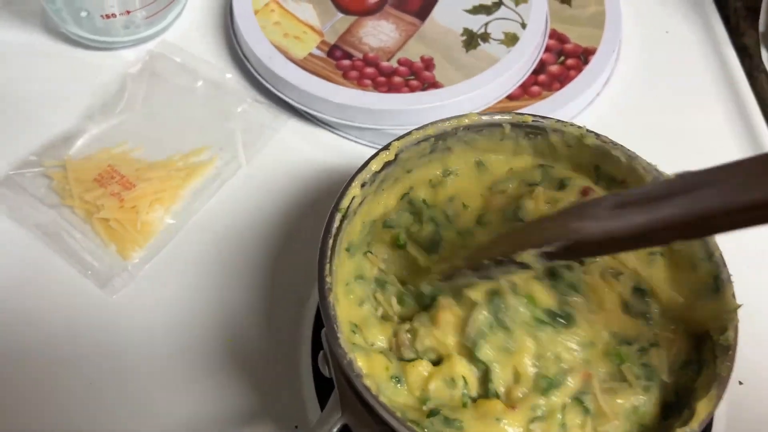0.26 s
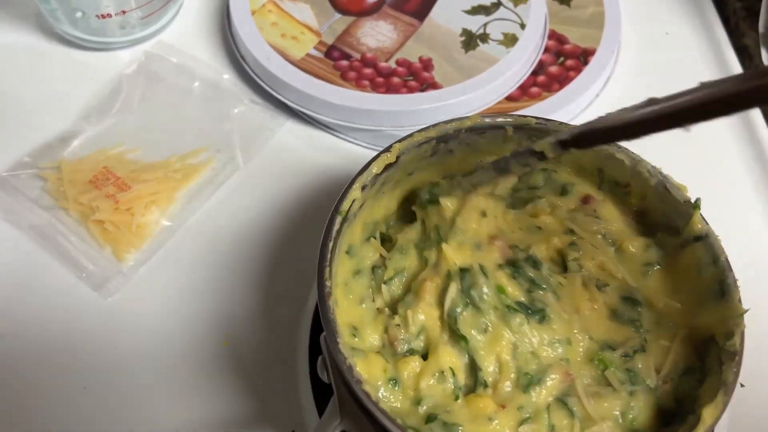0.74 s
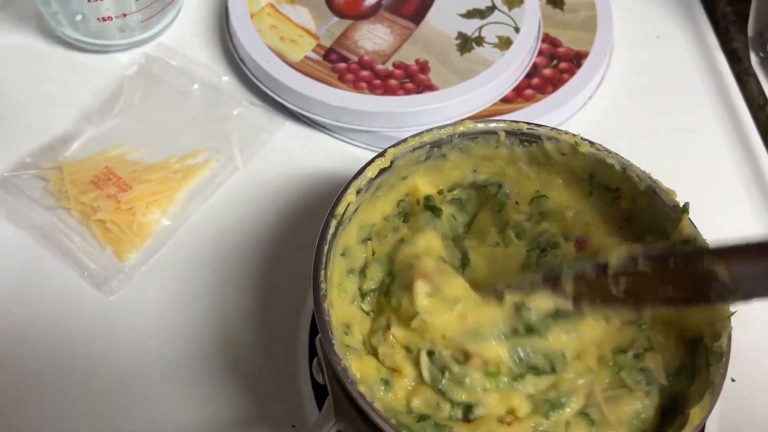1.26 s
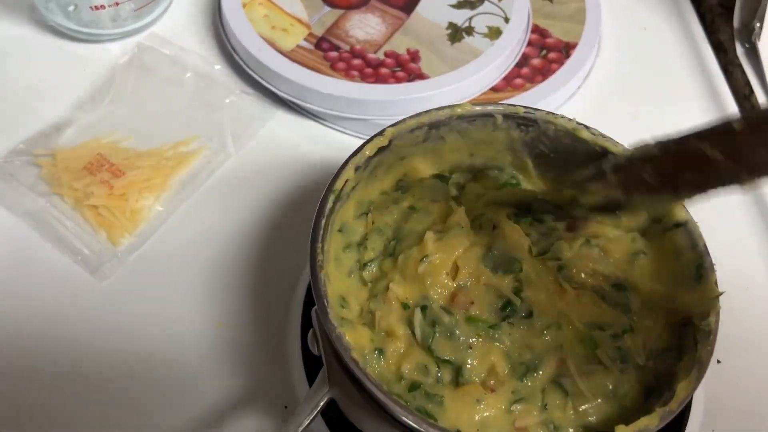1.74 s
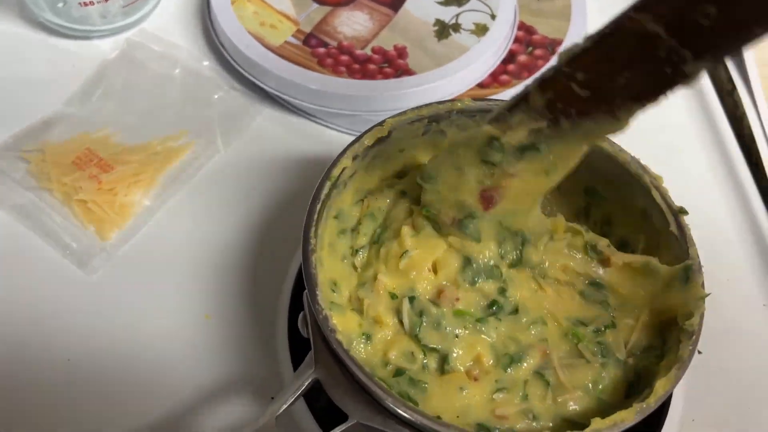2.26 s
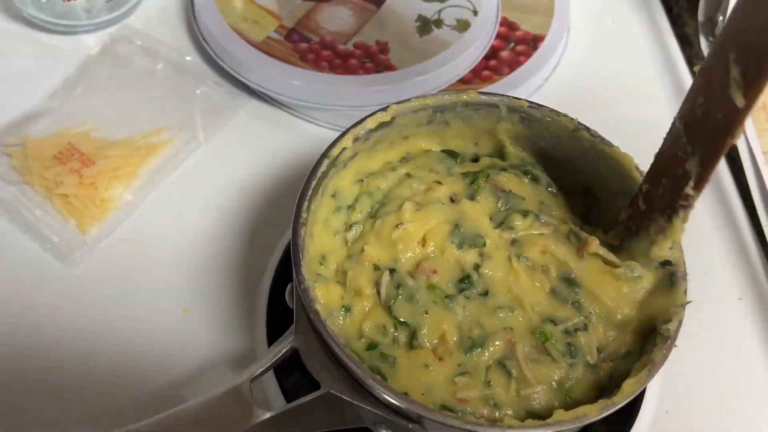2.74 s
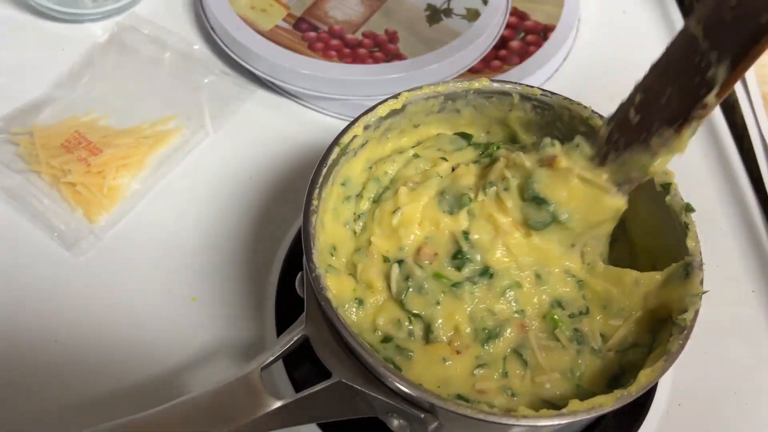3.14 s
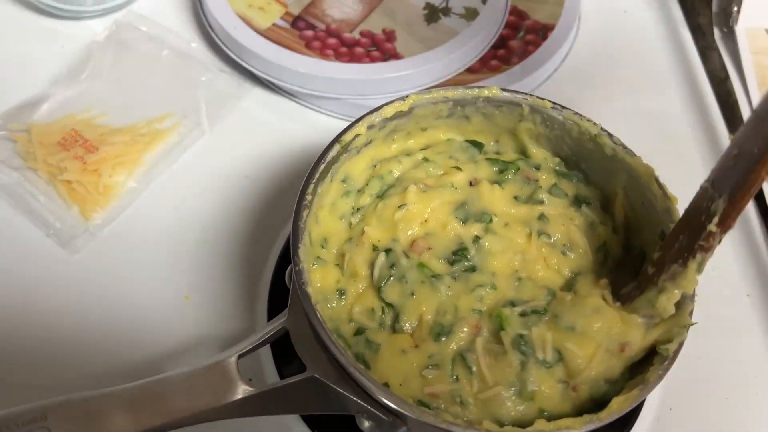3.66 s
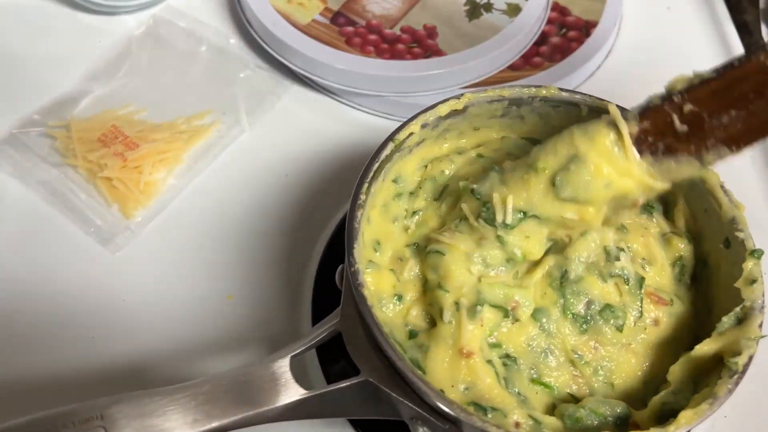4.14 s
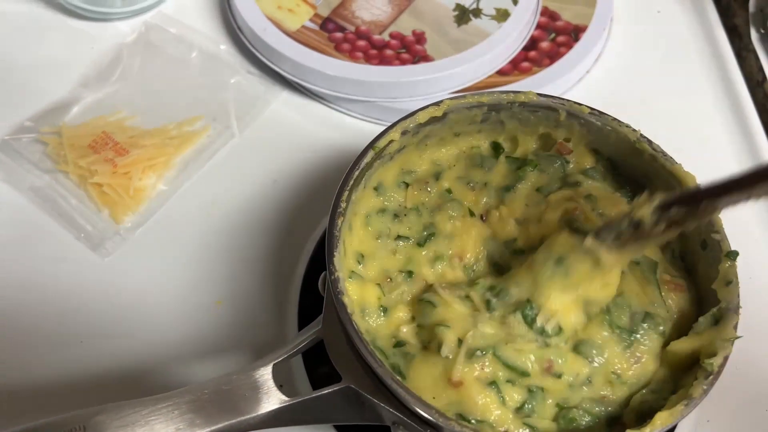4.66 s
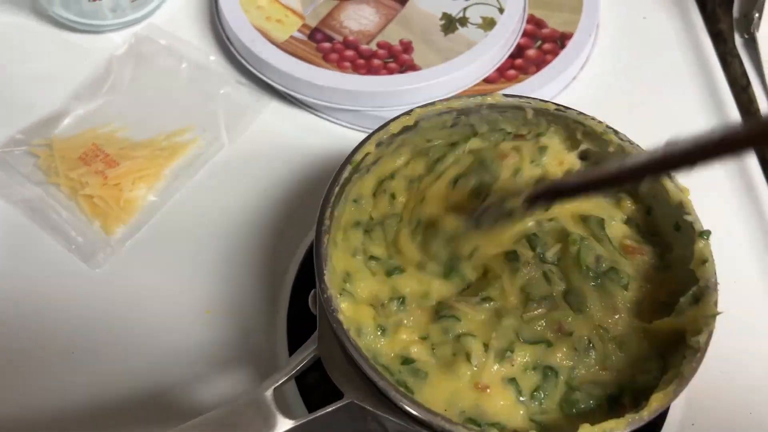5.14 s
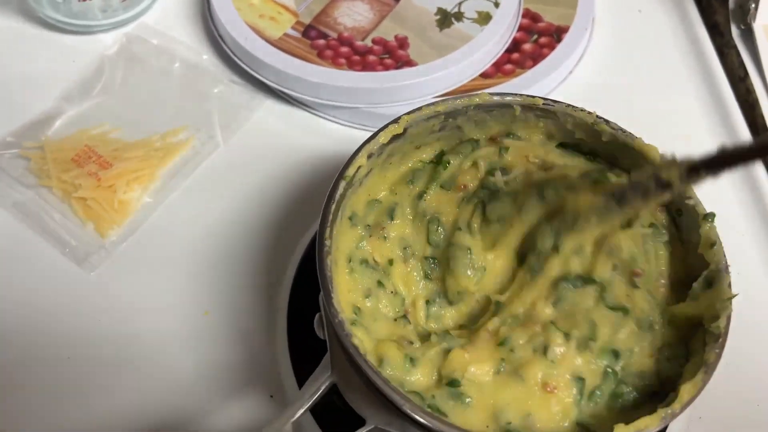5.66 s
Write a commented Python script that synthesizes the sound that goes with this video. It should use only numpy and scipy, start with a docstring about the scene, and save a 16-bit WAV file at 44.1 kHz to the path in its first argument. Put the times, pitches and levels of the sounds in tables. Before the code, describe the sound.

A wooden spatula stirs thick, sticky food in a steel saucepan, with dull knocks, short scrapes and wet smacks over a faint kitchen hum.

```python
"""Kitchen stove, close up: a wooden spatula stirs thick porridge in a steel saucepan, a phone microphone near it.
Uneven slips of wood on steel ring the food-damped pan modes, amid noise bands of hiss, drag and fizz.
The paste smacks as it tears (resonated noise), knocks ring the wall and thud the bottom (decaying sines).
The stove top wobbles under the pan (low noise); a kitchen appliance hums behind (wavering sines)."""
import sys
import numpy as np
from scipy import signal
from scipy.fft import rfft, irfft
from scipy.io import wavfile
from scipy.ndimage import uniform_filter1d

SR = 44100
rng = np.random.default_rng(int(sys.argv[2]) if len(sys.argv) > 2 else 0)


def transcribe(u):
    """Save the signal u as a 16-bit wav file named by the first command-line argument.

    u: samples, shape (n,) or (channels, n), limited to [-1, 1]; the rate is SR.
    q: integer samples, one column per channel.
    """
    v = np.clip(np.atleast_2d(u).T, -1, 1)
    q = np.round(v * 32767).astype(np.int16)
    wavfile.write(sys.argv[1], SR, q)


N = 259996
T = np.arange(N) / SR  # t/s


def gain_of(db):
    """Decibels to an amplitude factor."""
    return 10 ** (np.asarray(db) / 20)


def evened(x):
    """Scales to rms 1."""
    return x / np.sqrt(np.mean(x ** 2) + 1e-20)


def read(points, hz):
    """Reads a table of (f/Hz, value) on a log-frequency axis."""
    f, value = np.transpose(points)
    return np.interp(np.log(hz + 1), np.log(f + 1), value)


def coloured(x, points):
    """Filters by a table of (f/Hz, level/dB)."""
    gain = gain_of(read(points, np.fft.rfftfreq(len(x), 1 / SR)))
    return irfft(rfft(x) * gain, len(x))


def add(mix, s, sound):
    """Mixes a sound in at s seconds."""
    part = mix[round(s * SR):][:len(sound)]
    part += sound[:len(part)]


def resonate(x, hz, width):
    """A resonance of gain 1: shifts hz down to zero, smooths, and shifts back; hz may be a curve."""
    turn = np.exp(2j * np.pi * np.cumsum(hz * np.ones(len(x))) / SR)
    r = np.exp(-np.pi * width / SR)
    return 2 * (turn * signal.lfilter([1 - r], [1, -r], x / turn)).real


def lumps(ms, db):
    """A gain that wanders at random by db (rms) over some milliseconds."""
    size = max(int(ms * SR / 1000), 1)
    once = uniform_filter1d(rng.standard_normal(N), size)
    return gain_of(db * evened(uniform_filter1d(once, size)))


SLOPE_DB = 20  # gained over a rise time, lost over a release time


def swell(s, rise, hold, release):
    """A gain that climbs to 1 at s, holds, and dies away, all in seconds."""
    before = (s - T) / max(rise, .003)
    after = (T - s - hold) / max(release, .003)
    return gain_of(-SLOPE_DB * np.maximum(np.maximum(before, after), 0))


# kitchen air spectrum: (f/Hz, level/dB per Hz)
AIR_SPECTRUM = [(20, -27.5), (55, -8), (110, 1), (210, 5.5), (450, -21.5), (800, -21), (1100, -22),
                (1800, -23), (2600, -42.5), (3300, -40), (4500, -46), (8000, -64.5), (12000, -40.5),
                (16000, -43)]
# lines of the motor hum: (f/Hz, level/dB, waver width/Hz)
HUM_LINES = [(59.85, -44.5, 2.5), (119.6, -60, 1.5), (726, -63.5, 8.6)]
AIR_DB = -44.5


def background():
    """Kitchen air as coloured noise, and a motor hum of sines wavered by narrow noise."""
    out = gain_of(AIR_DB) * evened(coloured(rng.standard_normal(N), AIR_SPECTRUM)) * lumps(40., .9)
    for hz, db, width in HUM_LINES:
        waver = evened(resonate(resonate(rng.standard_normal(N), hz, width), hz, width))
        out = out + gain_of(db) * (np.sqrt(2) * np.sin(2 * np.pi * hz * T) + 0.1 * waver)
    return out


# spectrum of the shaking stove top: (f/Hz, level/dB per Hz)
SHAKE_SPECTRUM = [(22, -41.5), (34, -28), (45, 7.5), (60, 10), (80, -8), (110, 8.5), (160, -1.5),
                  (300, -43.5)]
# jolts that shake the stove top: (full strength t/s, level/dB, hold/s, release/s)
STOVE_JOLTS = [(0.2, -33.5, 0.068, .2), (0.566, -37, 0.051, 0.046), (0.861, -34.5, 0.018, 0.034),
               (0.956, -45.5, 0.18, .06), (1.39, -42, .01, .1), (1.65, -43, 0.029, .2),
               (1.85, -30, .01, .06), (2.48, -36, 0.011, .06), (2.59, -40, 0.0053, .04),
               (2.68, -34.5, .01, 0.033), (2.75, -36, .04, 0.027), (3.38, -37, .02, 0.027),
               (3.48, -28, .07, 0.091), (3.687, -38.5, .02, 0.049), (4.978, -34, .01, 0.16),
               (5.2, -49, .01, .1), (5.6, -38, .01, .1)]
JOLT_RISE_S, STOVE_REST_DB = 0.096, -49.5


def stove():
    """Low shaking of the stove top: the jolts add in power over a steady rest level."""
    jolts = sum((gain_of(db) * swell(s, JOLT_RISE_S, hold, dying)) ** 2 for s, db, hold, dying in STOVE_JOLTS)
    shaking = evened(coloured(rng.standard_normal(N), SHAKE_SPECTRUM))
    return np.sqrt(gain_of(STOVE_REST_DB) ** 2 + jolts) * shaking


# modes of the pan with food in it: (f/Hz, level/dB, t60/s before the length factor)
PAN_MODES = [(720, -8.5, 0.066), (980, -14, 0.11), (1160, -2.5, 0.065), (1430, 3.5, 0.093),
             (1590, 12.5, 0.034), (1740, -2.5, 0.051), (1838, 11, 0.031), (2020, -15, 0.077),
             (2206, -5, .05), (2598, -7.5, .05), (2670, -11.5, 0.026), (2840, -4, 0.04), (3150, -4, 0.078),
             (3200, -23.5, .04), (3590, -9.5, 0.018), (4237, -2.5, 0.038), (4540, -33.5, 0.018),
             (4950, -15.5, 0.2), (4907, -23, 0.032), (6240, -10.5, 0.043), (6500, -23, 0.028),
             (7230, -31, 0.049), (7670, -15.5, 0.092)]


def pan_ring(t, longer, spot_db):
    """All modes of the pan after one blow; the spot struck favours some, longer stretches every t60."""
    hz, db, t60 = np.transpose(PAN_MODES)[:, :, None]
    decay = gain_of(db + spot_db - 60 * t / (t60 * longer))
    return (decay * np.sin(2 * np.pi * hz * t)).sum(0)


def bubbles(per_s):
    """Tiny pockets in the paste burst in clumps, each a few cycles rising in pitch."""
    out, t = np.zeros(N), np.arange(600) / SR
    size = gain_of(2.3 * np.minimum(rng.exponential(1, N), 4))
    size = size * (rng.random(N) < per_s * lumps(15., 5.0) / SR)
    kind = rng.integers(0, 24, N)
    for k, hz in enumerate(np.geomspace(450, 6000, 24)):
        turns = hz * t
        shape = turns * np.exp(-turns / 1.1) * (450 / hz) ** 2.7  # higher pockets are weaker
        grain = np.sin(2 * np.pi * turns * (1 + 0.025 * turns)) * shape
        out += signal.oaconvolve(size * (kind == k), grain)[:N]
    return evened(out)


# pushes of the blade through the paste: (full pressure t/s, rise/s, hold/s, release/s, scrape level/dB,
# blade hiss level/dB, paste drag level/dB, fine paste fizz level/dB, chatter level/dB, chatter f/Hz)
BLADE_PUSHES = [(0.119, 0.029, .05, .03, -66, -58, -69, -63, -59, 1304),
                (0.19, 0.014, 0.026, .06, -29, -33, -28, -50, -33, 980),
                (0.277, 0.028, 0.03, 0.077, -31, -41.5, -32, -60, -39.5, 700),
                (0.343, 0.019, 0.02, .11, -32.5, -41.5, -28.5, -59, -36.5, 840),
                (0.515, .01, 0.022, .07, -32, -44, -32, -56, -56, 700),
                (0.622, 0.042, .005, .05, -42, -52, -36.5, -73, -41.5, 968),
                (0.678, .015, 0.0033, 0.17, -38, -56, -39.5, -79, -47, 698),
                (0.826, 0.017, .015, 0.044, -33, -53, -35.5, -67, -45, 813),
                (0.923, 0.06, 0.043, .08, -38.5, -50.5, -39.5, -54.5, -47, 1000),
                (1.013, .03, 0.012, 0.077, -38, -50.5, -38.5, -68, -42.5, 735),
                (1.077, .05, 0.023, 0.08, -35.5, -52, -35, -62, -45, 1050),
                (1.252, .015, .01, 0.069, -45, -60, -44, -63, -52, 749),
                (1.411, .05, .005, .05, -66.5, -64, -62, -61, -70, 725),
                (1.616, 0.0085, 0.017, 0.061, -42.5, -45.5, -35.5, -60, -60, 1160),
                (1.762, .05, 0.068, .04, -30.5, -50, -38.5, -51.5, -54, 1479),
                (1.786, .02, .02, 0.038, -44, -46, -36, -65, -29.5, 911),
                (1.85, .02, 0.015, 0.27, -43, -56.5, -38.5, -70, -50, 790),
                (2.071, .1, 0.0076, .04, -50, -86, -47.5, -67, -52.5, 900),
                (2.39, .01, .015, 0.11, -38, -38, -27, -56, -47, 1046),
                (2.6, 0.22, 0.062, 0.069, -32.5, -44, -41, -53, -52.5, 963),
                (2.684, .02, 0.0065, 0.082, -34.5, -44.5, -31, -63, -39.5, 1143),
                (2.725, .015, .01, .08, -28, -45.5, -32.5, -68, -32, 938),
                (2.78, .04, 0.018, 0.09, -43, -54, -32.5, -72, -52.5, 777),
                (3.149, .01, 0.0066, 0.021, -54, -61, -56.5, -92, -60, 791),
                (3.339, 0.012, .02, 0.06, -28.5, -39.5, -30, -62, -32, 791),
                (3.405, .03, 0.0043, 0.041, -30, -59, -39, -62, -47, 1125),
                (3.48, 0.028, .005, 0.0542, -19.5, -29.5, -24, -40.5, -28, 966),
                (3.526, 0.011, 0.069, 0.15, -27, -39, -30.5, -58, -38, 720),
                (3.677, 0.066, 0.036, .06, -45.5, -62, -35, -65, -39, 820),
                (4.04, 0.34, 0.028, 0.053, -54, -67.5, -50.5, -72.5, -58, 730),
                (4.163, 0.055, .005, 0.064, -55, -69, -61, -56.5, -65.5, 760),
                (4.279, .02, .003, 0.026, -61, -59, -53, -57.5, -66.5, 842),
                (4.457, 0.025, 0.02, 0.058, -44.5, -83, -48, -68.5, -43.5, 760),
                (4.953, .05, 0.031, .09, -32, -48.5, -38, -58, -37, 880),
                (5.05, 0.071, 0.06, .05, -45, -55, -38.5, -60, -34, 870),
                (5.088, 0.022, .02, .04, -29.5, -60, -34, -54, -34, 894),
                (5.134, 0.061, .015, .05, -30.5, -37.5, -41.5, -47.5, -33.5, 1450),
                (5.2, 0.093, 0.051, 0.13, -34.5, -45.5, -40.5, -53, -44.5, 860),
                (5.254, .04, .04, 0.056, -30, -48, -55, -55.5, -42, 1217),
                (5.298, 0.053, 0.015, .08, -57, -65, -32.5, -73, -42, 700),
                (5.58, .04, 0.051, 0.072, -33.5, -52.5, -37.5, -61.5, -41.5, 813),
                (5.703, .05, 0.039, .1, -46.5, -71, -46.5, -85, -55.5, 800),
                (5.842, 0.018, 0.0056, .03, -61, -59.5, -66, -56, -58, 780),
                (5.895, .05, .01, .03, -43, -60, -48, -63, -47, 890)]
# the blade glides between pushes: (scrape, hiss, drag, fizz, chatter level/dB, chatter f/Hz)
BLADE_GLIDE = (-63.5, -77.5, -51, -86.5, -66.5, 732.5)


def stroke_curves():
    """The pushes add in power over the glide; the chatter pitch leans to whichever chatters loudest."""
    *levels_db, hz = np.transpose([BLADE_GLIDE] + [row[4:] for row in BLADE_PUSHES])
    power = np.array([np.ones(N)] + [swell(*row[:4]) ** 2 for row in BLADE_PUSHES])
    layers = gain_of(levels_db) ** 2 @ power
    chatter_hz = (hz * gain_of(levels_db[-1]) ** 2) @ power / layers[-1]
    return *np.sqrt(layers), chatter_hz


# spectra of blade hiss, of fine paste fizz and of drag through the paste: (f/Hz, level/dB per Hz)
HISS_SPECTRUM = [(1500, -8.5), (2800, 4), (4500, -4.5), (7000, -10.5), (9000, -17), (11000, -35),
                 (16000, -52.5)]
FIZZ_SPECTRUM = [(3000, -30.5), (6000, -4.5), (9000, -5.5), (12000, -2.5), (16000, -4.5)]
DRAG_SPECTRUM = [(80, 10), (160, 2), (350, 13.5), (550, 10.5), (900, -13), (2000, -52.5)]


def stroke():
    """Uneven slips of wood on steel ring the pan; the blade hisses and drags through the fizzing paste."""
    scraping, hissing, dragging, fizzing, chattering, hz = stroke_curves()
    slips = rng.standard_normal(N) * gain_of(1.2 * rng.exponential(1, N))
    slips = slips * (rng.random(N) < 5000 / SR)  # about 5000 a second
    grip = lumps(7.9, 1.9)  # the blade catches and lets go
    octaves_up = np.log2(np.maximum(np.transpose(PAN_MODES)[0][:, None] / 2000, 1))
    dull_db = -5 * octaves_up  # soft slips barely reach high modes
    ring = evened(signal.oaconvolve(slips * grip, pan_ring(np.arange(4000) / SR, 0.32, dull_db))[:N])
    chatter = evened(resonate(resonate(slips * grip, hz, 420), hz, 350))
    grit = grip * lumps(2.5, 0.6)
    hiss = evened(coloured(rng.standard_normal(N) * grit, HISS_SPECTRUM))
    fizz = evened(coloured(rng.standard_normal(N) * grit, FIZZ_SPECTRUM))
    drag = evened(coloured(rng.standard_normal(N) * lumps(12., 2.5), DRAG_SPECTRUM))
    scrape = .5 * ring + 0.46 * bubbles(900)
    return scraping * scrape + hissing * hiss + dragging * drag + fizzing * fizz + chattering * chatter


# short bursts: (t/s, pitched level/dB, pitch f/Hz, decay/ms, crackle level/dB)
# the paste tears or an air pocket pops, except at 2.3442 s: a faint short burst of noise near 3100 Hz
SHORT_BURSTS = [(0.103, -44, 1740, 3.3, -47), (0.123, -42, 1680, 3.0, -38), (0.258, -36, 1570, 2.2, -31),
                (0.4105, -33, 3380, 2.4, -58), (0.4466, -30, 1920, 3.5, -34), (0.4909, -60, 1700, 2, -36),
                (0.6011, -66, 4500, 1.5, -49), (0.7095, -52, 1700, 2.7, -41), (1.108, -55, 1700, 2, -54),
                (1.9905, -60, 1700, 2, -62), (2.069, -62.5, 1500, 2, -52),
                (2.3442, -42.5, 3100, 7.4, -53.5), (3.2461, -56, 2300, 4.1, -72.5),
                (3.285, -42.5, 2500, 1.8, -57), (3.5878, -50, 1700, 2, -29),
                (4.815, -60.5, 1700, 1.6, -51.5), (5.3553, -66, 1700, 2, -50), (5.513, -56, 1700, 2, -42.5),
                (0.575, -44, 3800, 10, -53), (0.617, -33, 1510, 4.9, -62), (0.683, -52, 1820, 3.0, -55),
                (0.763, -40, 1710, 2.6, -42), (1.002, -37, 1430, 3.4, -57), (1.0824, -49, 1790, 2.1, -57),
                (1.2531, -46, 1600, 2.4, -50), (1.4074, -68, 1820, 2, -57), (1.6534, -43, 1540, 6.5, -26),
                (1.9123, -39, 1520, 3.0, -48), (1.9605, -43.5, 3020, 4.8, -50),
                (2.0085, -43, 1620, 3.3, -48), (2.792, -39, 3060, 4.2, -52.5),
                (2.9294, -55, 1990, 3.0, -67), (2.957, -44, 1590, 6.9, -50),
                (3.1557, -37.5, 2350, 3.8, -79), (3.7213, -30.5, 2970, 4.1, -46),
                (3.852, -48, 1750, 3.5, -45), (3.902, -43, 1410, 4.5, -44), (3.9514, -50, 1680, 3.0, -41.5),
                (3.968, -55, 1430, 2.2, -49.5), (3.9814, -55, 1680, 2.7, -48),
                (4.038, -48.5, 3200, 2.8, -42), (4.2707, -42.5, 1480, 3.7, -37),
                (4.2974, -49, 1560, 3.0, -66), (4.338, -50, 1457, 3.6, -45.5),
                (4.373, -40.5, 1620, 2.7, -69), (4.4165, -44, 1590, 4.3, -69.5),
                (4.6863, -45.5, 1790, 4.9, -68), (4.8723, -49, 1390, 1.8, -42),
                (4.886, -64, 1760, 2.7, -41), (5.4992, -43, 4400, 2.5, -52.5),
                (5.8402, -53, 1680, 1.9, -39.5)]


def smacks():
    """Paste smacks, a crackle with a brief pitch from the pocket left, and one faint burst made alike."""
    out, t = np.zeros(N), np.arange(2500) / SR
    noise = rng.standard_normal((len(SHORT_BURSTS), len(t)))
    for (s, db, hz, ms, crackle_db), rough in zip(SHORT_BURSTS, noise):
        shape = np.exp(-t / (max(ms, .2) / 1000)) * (1 - np.exp(-t / 0.00097))
        pitched = evened(resonate(resonate(rough, hz, .2 * hz), hz, .2 * hz))
        crackle = evened(coloured(rough, FIZZ_SPECTRUM)) * (np.exp(-t / 0.00021) + 0.22 * shape)
        add(out, s, gain_of(db) * shape * pitched + gain_of(crackle_db) * crackle)
    return out


# blade against the pan: (t/s, wall ring level/dB, its centre f/Hz, ring length factor, contact/ms,
# high modes level/dB, their centre f/Hz, bottom thud level/dB, thud f/Hz once sagged, thud t60/s,
# stove bump level/dB, edge tick level/dB)
PAN_KNOCKS = [(0.187, -5, 900, 0.5, 0.33, -22, 5600, -4, 394, 0.014, -11.5, -18.5),
              (0.205, -10, 880, 0.32, 0.19, -34, 3500, -29.5, 365, 0.031, -49, -24.5),
              (0.515, -12, 765, 0.54, 0.51, -30.5, 4200, -11.5, 400, 0.025, -20, -34),
              (0.816, -29.5, 1140, 0.22, 0.41, -37.5, 3500, -27, 420, 0.052, -35, -46),
              (1.6146, -16.5, 1820, 0.38, 0.97, -19, 3000, -27.5, 430, 0.14, -26.5, -31),
              (1.827, -14.5, 930, 0.51, 0.66, -37.5, 3000, -7, 373, 0.02, -19.5, -39),
              (2.3694, -13.5, 1850, 0.49, 0.3, -7, 3300, -11.5, 401, 0.031, -17, -16.5),
              (2.658, -17.5, 703, 0.69, 0.66, -42.5, 3500, -7, 369, 0.021, -16.5, -58),
              (2.686, -34, 1900, 0.36, 0.4, -33, 3100, -29.5, 363, 0.031, -28.5, -61),
              (2.728, -19, 950, 0.22, 0.25, -46, 3500, -20.5, 500, 0.018, -33.5, -56),
              (3.3245, -16, 1900, 0.29, 0.45, -3, 2500, -14.5, 354, 0.086, -48.5, -22),
              (3.3276, -13, 1116, 0.37, 0.74, -15, 2480, -14, 377, 0.035, -25.5, -28.5),
              (3.46, -26, 800, 0.18, 0.38, -40.5, 3500, -5.5, 428, 0.019, -14.5, -39),
              (3.467, -11.5, 970, 0.49, 0.37, -30, 2700, -30.5, 373, 0.17, -48, -28.5),
              (5.077, -42, 1037, 0.54, 0.58, -47, 3500, -19, 603, 0.037, -51, -55),
              (5.126, -33, 1490, 0.56, 1, -30, 2700, -20, 557, 0.032, -33, -49)]


def knocks():
    """Each blow: ring of the wall, a sagging thud of the bottom, a bump of the stove, a tick of the edge."""
    out, t = np.zeros(N), np.arange(5000) / SR
    modes_hz = np.transpose(PAN_MODES)[0][:, None]
    high = modes_hz > 2400
    spots = rng.standard_normal((len(PAN_KNOCKS), len(PAN_MODES), 1))  # dB, a random spot per blow
    noise = rng.standard_normal((len(PAN_KNOCKS), len(t)))
    for row, spot, rough in zip(PAN_KNOCKS, spots, noise):
        s, ring_db, centre_hz, longer, ms, high_db, high_hz, thud_db, hz, t60, bump_db, tick_db = row
        rise = (1 - np.exp(-t / (max(ms, .05) / 1000))) ** 2
        # loudest while the wood touches, then the paste damps it
        clack = 1 + 1.49 * np.exp(-(t / (0.009 * longer)) ** 2)
        # modes close to the centre pitch lead
        near_db = ring_db - 45 * np.log2(modes_hz / centre_hz) ** 2
        bright_db = high_db - 22.0 * np.log2(modes_hz / high_hz) ** 2
        wall = pan_ring(t, longer, spot + np.where(high, -120, near_db))
        edge = pan_ring(t, longer, spot + np.where(high, bright_db, -120))
        tick = coloured(rough, HISS_SPECTRUM) + 0.65 * coloured(rough, FIZZ_SPECTRUM)
        edge += gain_of(tick_db - 60 * t / 0.079) * tick
        # the pitch sags as the paste takes the load
        sweep = hz * (t + 0.0015 * (1 - np.exp(-t / 0.0017)))
        heave = (1 - np.exp(-t / 0.0019)) * (1 + 1.77 * np.exp(-(t / 0.0048) ** 4))
        thud = heave * gain_of(thud_db - 60 * t / t60) * np.sin(2 * np.pi * sweep)
        bump = gain_of(bump_db - 60 * t / 0.05) * np.sin(2 * np.pi * 200 * t)
        add(out, s, rise * (clack * wall + thud + bump))
        # in a soft landing the edge meets the steel late
        lag = np.clip(.00014 * (thud_db - high_db), 0, .004)
        add(out, s + lag, rise * clack * edge)
    return out


# decay of the kitchen: (f/Hz, t60/s)
KITCHEN_DECAY = [(150, 0.21), (500, 0.21), (2000, 0.15), (6000, 0.067), (14000, 0.08)]


def kitchen(x):
    """Room echo: sparse taps of random sign, each band dying at its own speed."""
    taps = np.zeros(SR // 2)
    at = np.arange(150, len(taps) - 20, 20)
    taps[at + rng.integers(0, 20, len(at))] = rng.choice([-1., 1.], len(at))
    hz, t, z = signal.stft(taps, SR, nperseg=256)
    decay = gain_of(-60 * t / read(KITCHEN_DECAY, hz)[:, None])
    tail = signal.istft(z * decay, SR, nperseg=256)[1]
    return signal.fftconvolve(x, tail / np.linalg.norm(tail))[:N]


# phone microphone and its port: (f/Hz, level/dB)
PHONE_RESPONSE = [(18, -30), (30, -12), (42, 0), (8800, 0), (9500, -5), (9900, -22), (10400, -22),
                  (10900, -3), (12000, 3), (15600, -4)]


def scene():
    """Knocks, smacks and strokes feed the room; they, stove and background reach the phone through its port."""
    near = knocks() + smacks() + stroke()
    room = gain_of(-13.5) * kitchen(near)
    return np.array([coloured(near + room + stove() + background(), PHONE_RESPONSE)])


EDGE_HZ = 15800  # top of the band


def record(dry):
    """The loudest peaks are rounded off; then a low-pass limits the band."""
    rounded = dry / (1 + (abs(dry) / .74) ** 4) ** .25
    low_pass = signal.firwin(511, EDGE_HZ, window=("kaiser", 9), fs=SR)
    return signal.oaconvolve(rounded, low_pass[None], "same")


dry = scene()
out = record(dry)
transcribe(out)
```